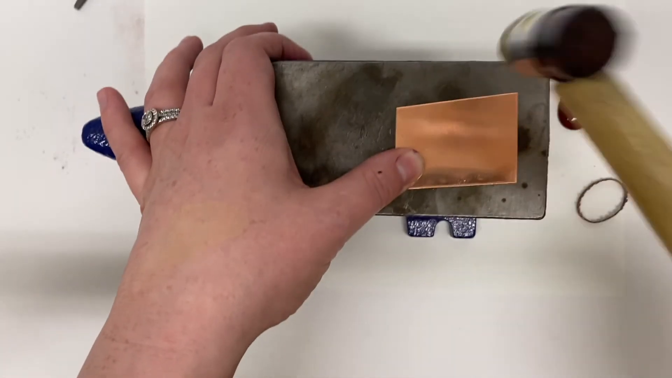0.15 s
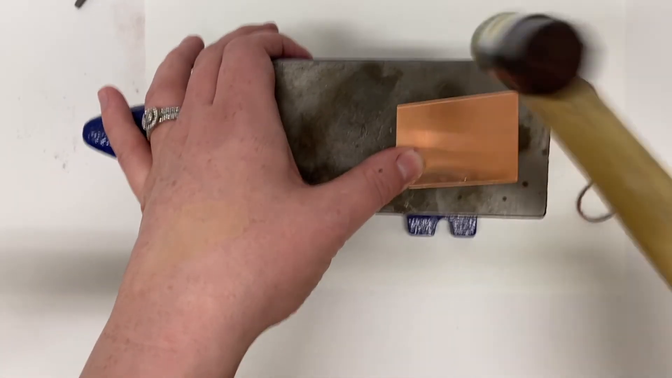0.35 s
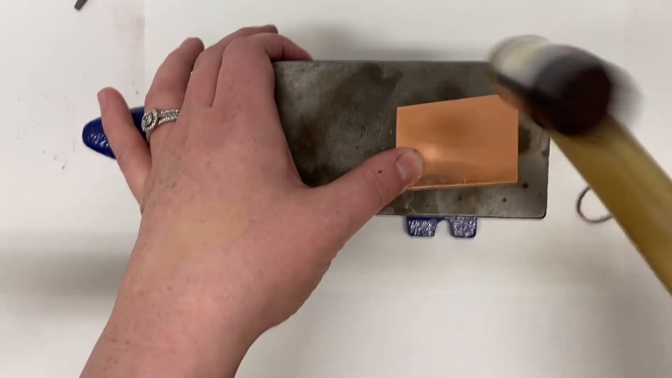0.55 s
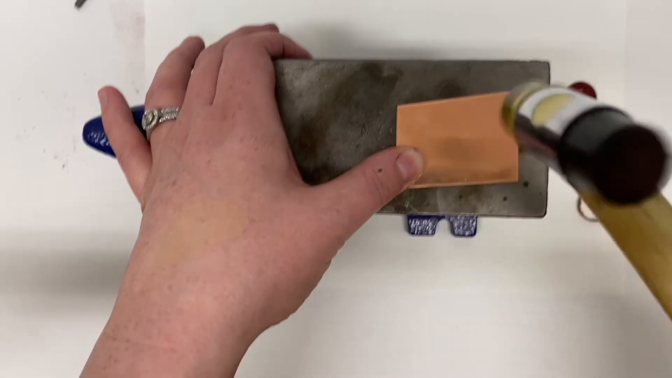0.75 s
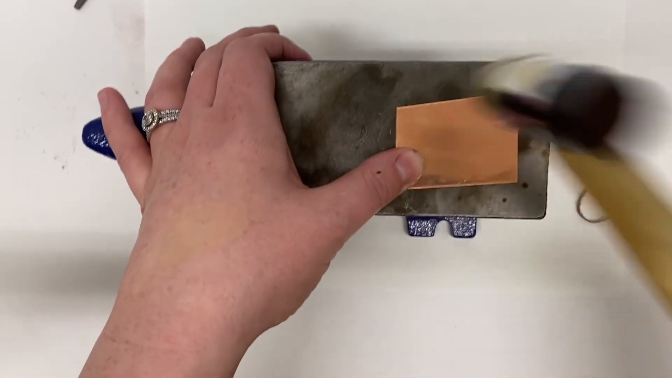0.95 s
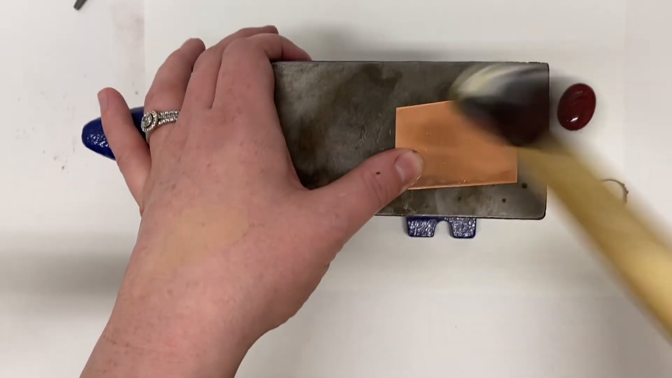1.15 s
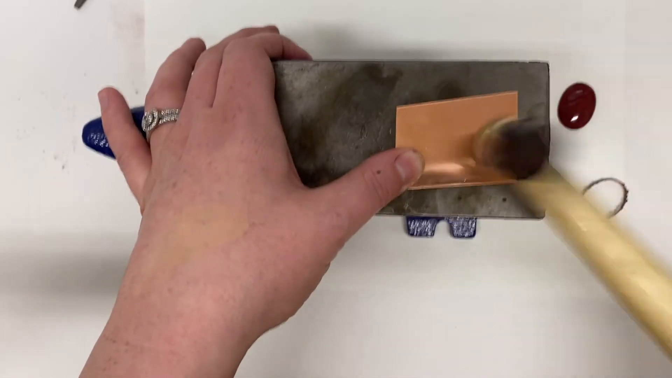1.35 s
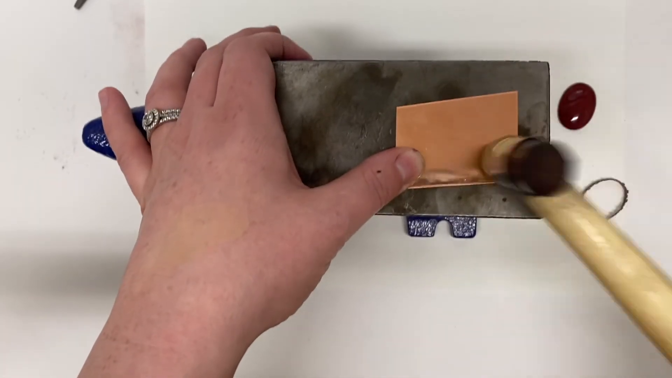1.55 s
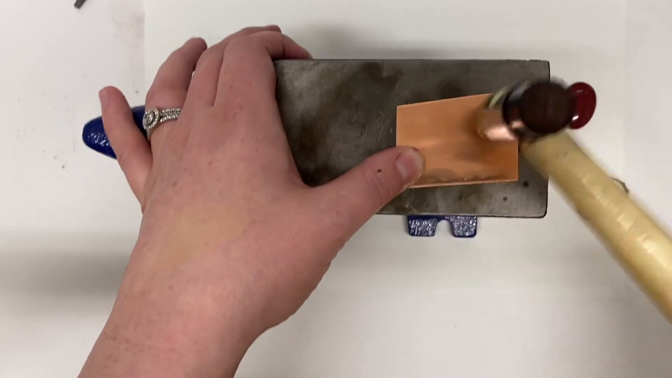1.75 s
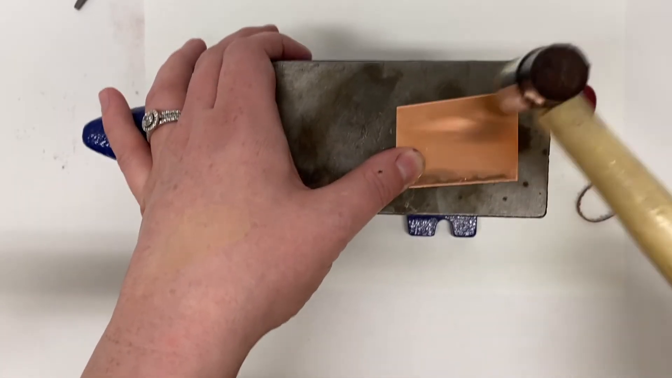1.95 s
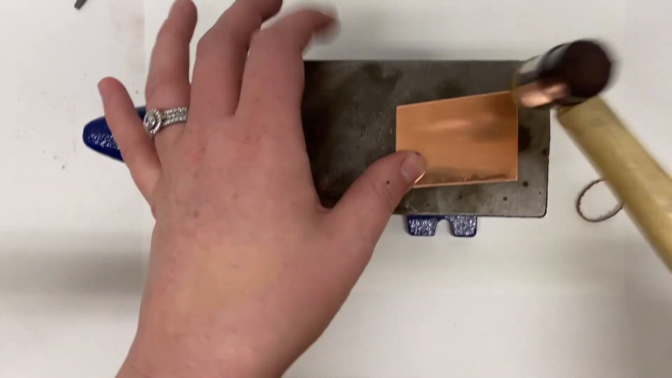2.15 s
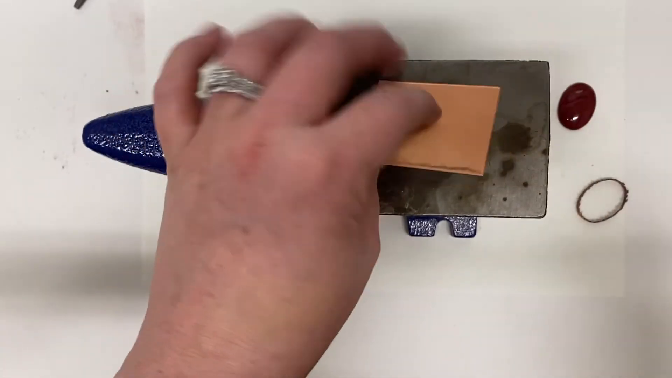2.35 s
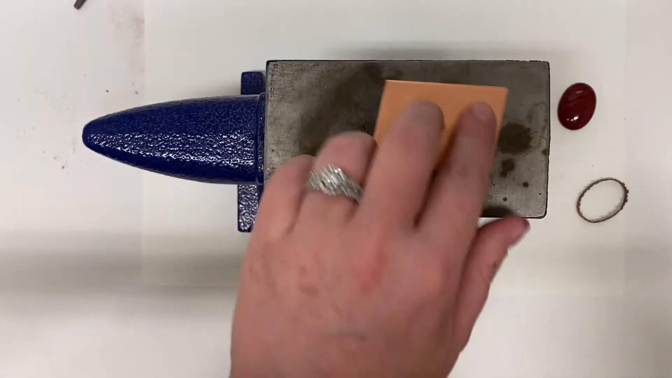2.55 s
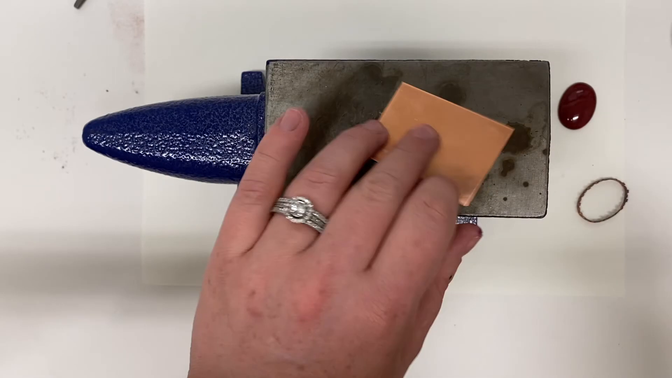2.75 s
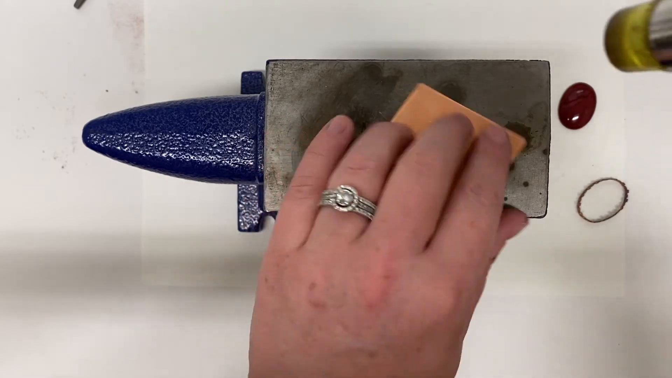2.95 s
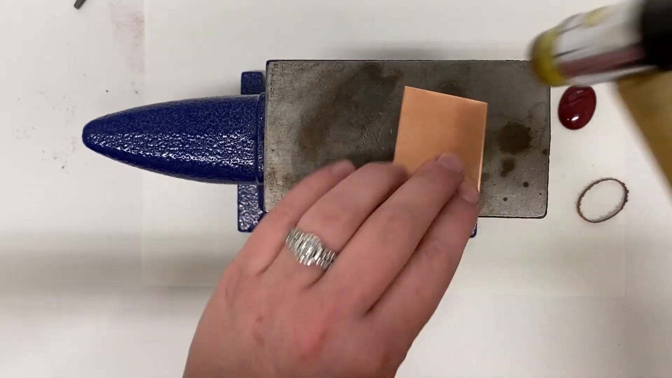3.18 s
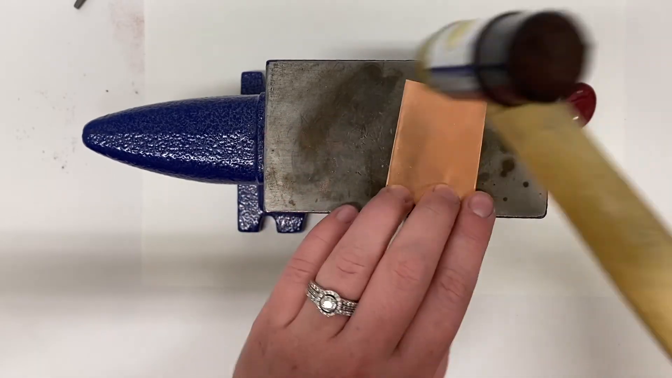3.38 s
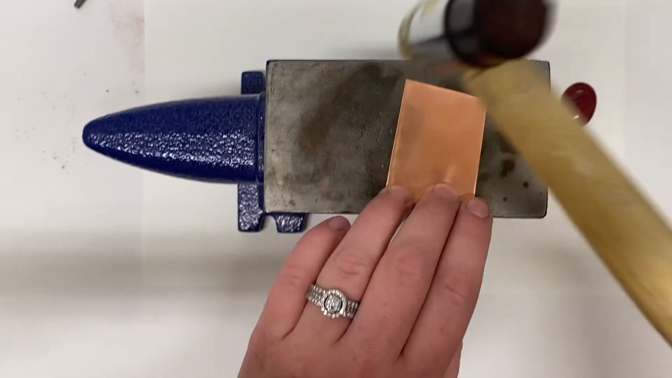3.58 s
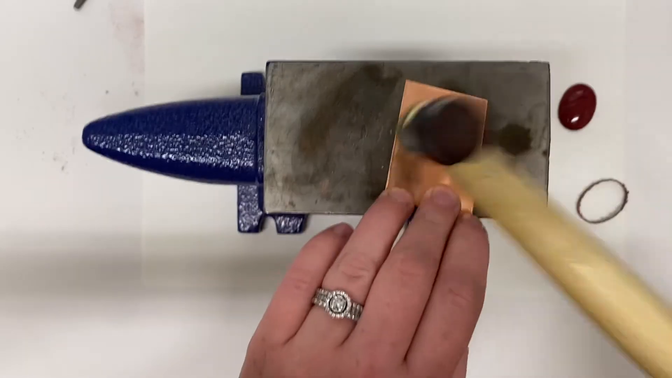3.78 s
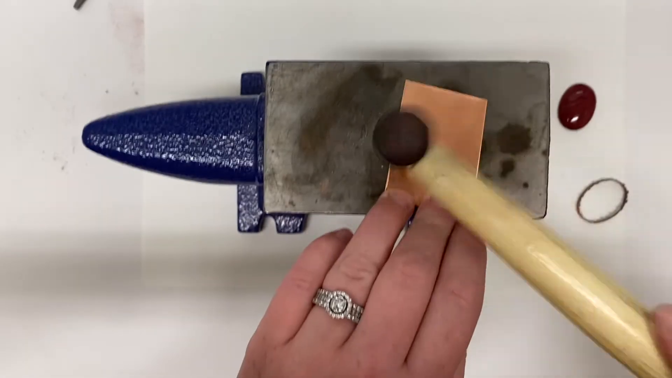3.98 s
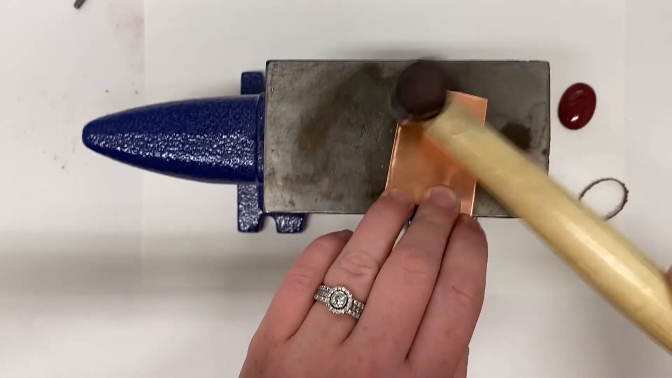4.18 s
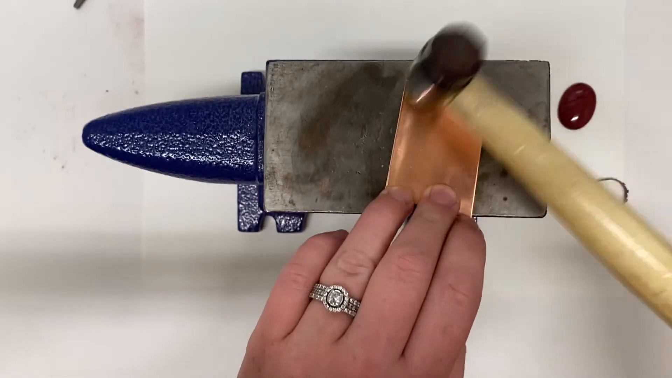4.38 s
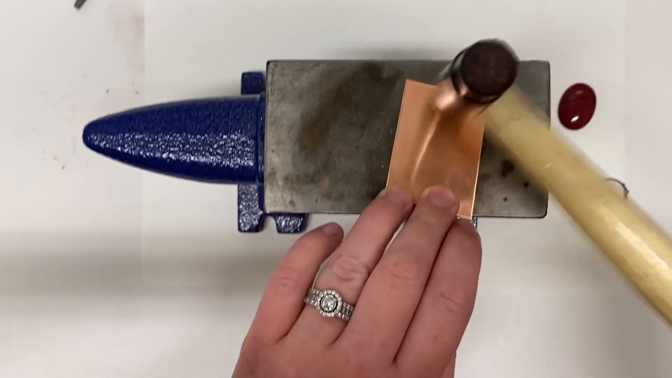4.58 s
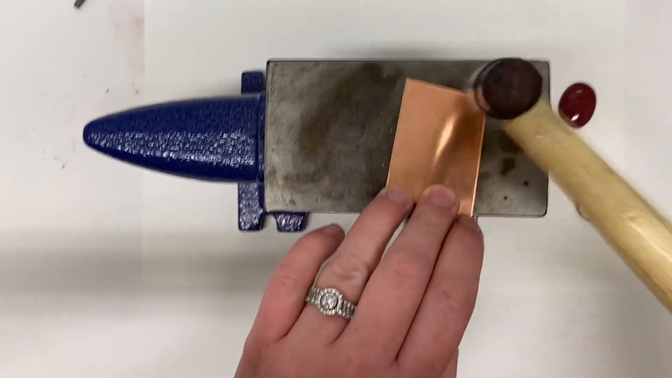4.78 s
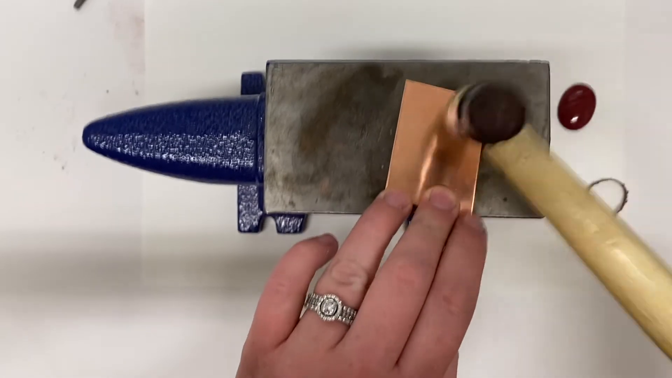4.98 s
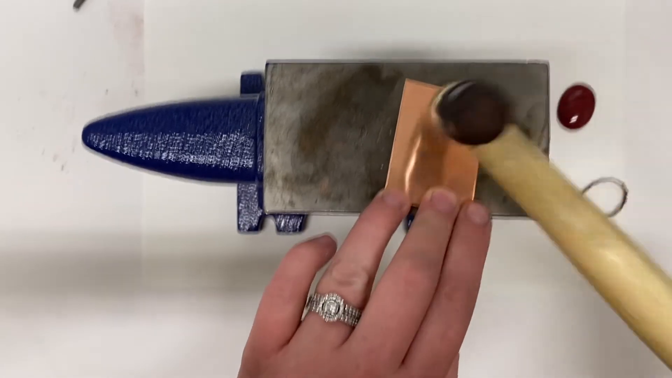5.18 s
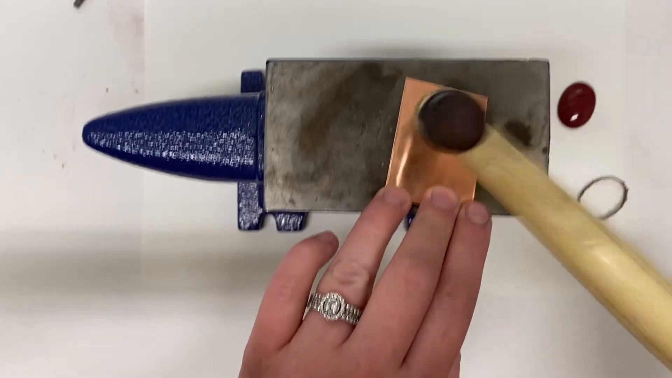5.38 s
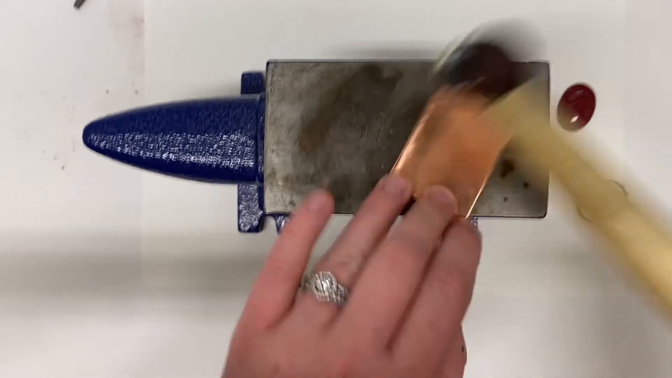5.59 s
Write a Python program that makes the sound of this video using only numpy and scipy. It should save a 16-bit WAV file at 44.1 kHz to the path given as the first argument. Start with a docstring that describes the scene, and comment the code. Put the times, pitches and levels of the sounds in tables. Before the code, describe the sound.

A mallet raps a thin copper sheet on a small steel anvil in two quick, even series, with faint sheet-turning scrapes and ticks between.

```python
"""A mallet beats a small copper sheet on a steel anvil in two quick series, close under a stereo microphone.
Each blow is a light first touch, a slap of choked tones and noise bursts, a thud of damped bench modes
and clatter of decaying noise from a small room.
Between the series fingers turn the sheet: it slides as grainy noise, ticks as short puffs and makes the
anvil sing thinly. Quiet steady noise is the rumble of the room."""
import sys
import numpy as np
from scipy import signal
from scipy.fft import rfft, irfft
from scipy.io import wavfile
from scipy.ndimage import uniform_filter1d, minimum_filter1d

SR = 44100
rng = np.random.default_rng(int(sys.argv[2]) if len(sys.argv) > 2 else 0)


def persist_wave(psi):
    """Save psi, clipped to +-1, as 16-bit WAV."""
    counts = np.round(np.clip(psi, -1, 1) * 32767).astype(np.int16)
    wavfile.write(sys.argv[1], SR, np.atleast_2d(counts).T)


N = 248279

# Mallet blows, the first still dying away at the start: t/s, force/dB, lower sheet resonance f/Hz,
# its level/dB, upper sheet resonance f/Hz, fizz level/dB relative to the body of the slap
BLOWS = [(-.145, 4, 3295, -6, 5360, -3), (0.0422, 1, 3770, -1.5, 5294, -3.5),
         (.2312, -1, 3400, -4, 5050, -5.5), (0.4168, -1, 3397, -2.5, 5240, -4.5),
         (0.61, -1, 3353, -3.5, 5360, -1), (0.792, -1, 3438, -8.5, 5317, 0.5),
         (0.9746, -1, 3420, -8, 5620, -1), (1.1615, -1, 3443, -5.5, 5350, -2),
         (1.3437, .5, 3960, -5.5, 5520, -2), (1.5289, 1.5, 3820, -5.5, 5420, -1.5),
         (1.7149, -1, 3852, -7.5, 5470, 1.5), (1.9005, 0, 3410, -1.5, 5250, -2),
         (2.082, 0, 3720, -3.5, 5350, -5.5), (3.446, -2, 3130, -3, 5530, -2.5),
         (3.6189, -.5, 3540, -2.5, 5680, -5.5), (3.795, -0.5, 3400, -9, 5180, -2),
         (3.9782, 1, 2775, 0, 5150, -3.5), (4.1726, .5, 3420, -3.5, 5145, -5.5),
         (4.3574, .5, 3310, -3, 5054, -3), (4.547, .5, 3384, -3.5, 5240, -4),
         (4.7394, 1.5, 2543, -9, 5330, -2.5), (4.9292, -1.5, 3390, -7.5, 5360, 0),
         (5.1244, -0.5, 3370, -4.5, 5110, -3), (5.317, -.5, 3365, -5.5, 5280, -5),
         (5.5121, -2, 2656, -3.5, 5450, -3)]
# The room around the bench, relative levels: f/Hz, near reflections level/dB, their t60/s,
# late tail level/dB, its t60/s, left-right likeness (0 to 1)
ROOM = [(40, -7.5, .2, -5.5, 0.93, 0.94), (152, -2.5, 0.067, -8.5, 0.073, 1),
        (273, -12.5, 0.28, -13, 1, 0.74), (620, -6.5, 0.034, -11, 0.57, 0.32),
        (1400, -7, 0.049, -11, 0.29, 0.52), (4000, -14.5, .07, -16, 0.55, .7),
        (12000, -14, .07, -19, .25, 0.66)]


def slaps():
    """Sheet slapped on steel: first touch, then a few ms of ringing that the pressure chokes."""
    # Sheet and mallet face while in contact: f/Hz, level/dB
    clack_modes = [(1000, -29), (1500, -25.5), (1950, -11.5), (2400, -19), (2780, -6), (3810, -22),
                   (4250, -21), (4650, -15.5), (4900, -7.5), (5750, -8), (6200, -11.5), (6800, -9.5)]
    # Treble noise of first contact: f/Hz, width/Hz, level/dB within the band set
    fizz_bands = [(8330, 600, 12.5), (7200, 1600, -7.5), (10030, 1100, -10), (11930, 1500, -4)]
    # Highest, shortest noise, same columns
    air_bands = [(14000, 690, -3), (15700, 800, -0.5), (13000, 800, 5)]
    slap_db, slap_share = -13.5, .05  # level at force 0 dB; share of the force in dB that the slap follows
    grit_db, mean_air_db, air_vary_db = -5.5, -13.5, 2.5  # relative to the body of the slap
    touch_lead_s, mean_touch_db, touch_vary_db = .0083, -42.5, 2.5  # mallet first brushes the raised sheet

    out, t = np.zeros(N), np.arange(1500) / SR
    for s, force_db, low_hz, low_db, high_hz, fizz_db in BLOWS:
        modes = clack_modes + [(low_hz, low_db), (high_hz, 0)]
        hz, mode_db = np.transpose(modes)[:, :, None]
        # each blow lands elsewhere: phase, pitch and level of every mode differ
        turn = rng.random(hz.shape)
        tune, vary = rng.standard_normal((2, *hz.shape))
        phase = 2 * np.pi * (hz * (1 + 0.0041 * tune) * t + turn)
        tones = gain_of(mode_db + 1.6 * vary) * np.sin(phase)
        body = peaked(contact(t, 0.00076, 0.0021, 0.0013) * tones.sum(0))

        grit_burst = burst(t, 0.00032, 0.0017, 0.0027)
        grit = peaked(resonate(grit_burst, [(3120, 1500, 0.0015), (5770, 2700, 0.011)]))
        fizz = peaked(resonate(burst(t, 0.00017, 0.002, 0.0011), fizz_bands))
        air = peaked(resonate(burst(t, 0.000067, 0.00047, 0.00016), air_bands))
        air_db = mean_air_db + air_vary_db * rng.standard_normal()
        touch_db = mean_touch_db + touch_vary_db * rng.standard_normal()

        whole = body + gain_of(grit_db) * grit + gain_of(fizz_db) * fizz + gain_of(air_db) * air
        add(out, s, gain_of(slap_db + slap_share * force_db) * whole)
        add(out, s - touch_lead_s, gain_of(touch_db) * tap(3000, 0.0067, -34.0, -26.5))
    return out


def bench():
    """The thud of one blow: a jolt, its modes and echoes, the bass arriving last through the bench top."""
    # Bench and anvil mount: f/Hz, level/dB (relative), t60/s, left minus right level/dB
    bench_modes = [(46, -19, 0.44, 0), (60, -21, .6, -2), (81.5, -18, 0.43, -2), (101.7, -22, 1, 1.5),
                   (109.6, -32, 1, 1.5), (151.9, -14.5, 0.62, -3.5), (193, -24.5, 0.13, -2.5),
                   (197.7, -13, 0.4, -0.5), (261.1, -6, 0.63, -2.5), (318, -14.5, 0.097, 3.5),
                   (332.3, -12, 0.25, -3.5), (376, -20.5, 0.075, -5.5), (425.3, -1.5, 0.1, -3),
                   (433.3, -1.5, 0.091, -12.5), (489, -21.5, .3, -2), (509, -12.5, 0.37, -0.5),
                   (563, -1.5, 0.1, -1.5), (637.5, -24, 0.097, -18), (643.7, -15.5, 0.15, -6),
                   (835, -21.5, 0.7, -4), (971, -20, 0.11, -5), (922, -21.5, 0.27, 1), (1064, -29, .1, 1),
                   (1290, -25.5, .1, -3)]
    # First jolt of the bench top, same columns
    punch_modes = [(277, -3, 0.099, 1), (444, 17, 0.0067, 0.5), (634, 6.5, 0.03, -7), (884, -2, 0.075, -1)]
    spread = .14  # bending waves arrive after spread / sqrt(Hz) seconds, plus a fixed delay

    hz, t = np.fft.rfftfreq(SR, 1 / SR), np.arange(SR) / SR
    small_top = (1j * hz / (1j * hz + 130)) ** 2  # a small top radiates no deep bass
    jolt = irfft(rfft(wood(punch_modes)) * small_top, SR)
    echoes = signal.fftconvolve(jolt, tail(ROOM), axes=1)[:, :SR]
    thud = jolt + wood(bench_modes) + gain_of(5.5) * echoes

    push = (t / .0001) ** 2 * np.exp(-t / .0001)  # soft face: a smooth force, mostly within 1 ms
    travel = np.exp(-4j * np.pi * spread * np.sqrt(hz) - 2j * np.pi * hz * 0.004888)
    low_cut = 1 / (1 + (42 / (hz + 1)) ** 4)
    return gain_of(-3.0) * irfft(rfft(thud) * rfft(push / push.sum()) * travel * low_cut, SR)


def aftersound():
    """Thud and scattered clatter of every blow; the thud repeats alike, the noise of the clatter is new."""
    # Clatter of the slap scattered by the room, relative levels: f/Hz, near reflections level/dB,
    # their t60/s, late tail level/dB, its t60/s, left-right likeness (0 to 1)
    scatter = [(695, -26, 0.044, -20.5, 0.58, 0.17), (1260, -19.5, .08, -26, 0.4, 0.27),
               (2420, -20.5, 0.14, -27, 0.64, .6), (3270, -9.5, .07, -12.5, 0.38, 1),
               (4400, -22, 0.076, -24, 0.38, 0.28), (5330, -16.5, 0.41, -27, 0.64, 1),
               (7210, -21, 0.092, -20, 0.13, 0.98), (8600, -18.5, 0.13, -33, 0.55, 1),
               (12190, -30.5, 0.081, -24, 0.078, 0.39), (15200, -33, .06, -33, .2, .9),
               (16300, -59.5, .06, -61.5, .2, .9)]
    thud_db, clatter_db = -25.5, 17  # gains at force 0 dB
    clatter_share = .15  # the thud follows the force in full, the clatter far less

    thuds, clatter, thud = np.zeros((2, N)), np.zeros((2, N)), bench()
    for s, force_db, low_hz, low_db, high_hz, fizz_db in BLOWS:
        add(thuds, s - .0089, gain_of(thud_db + force_db) * thud)
        echoes = tail(scatter)
        # the echoes keep the colour of their blow
        echoes += resonate(echoes, [(high_hz, 300, -5.0), (low_hz, 300, low_db)])
        add(clatter, s + 0.0029, gain_of(clatter_db + clatter_share * force_db) * echoes)
    return thuds + ring(clatter, 1.0)


def wood(modes):
    """One second of damped sines for two channels, each mode leaning to one side."""
    t, out = np.arange(SR) / SR, np.zeros((2, SR))
    for hz, db, t60, lean_db in modes:
        sides = gain_of([[lean_db / 2], [-lean_db / 2]])
        out += sides * gain_of(db - 60 * t / t60) * np.sin(2 * np.pi * hz * t)
    return out


def ring(x, db):
    """Anvil and sheet sing on briefly after any contact, as resonances driven by it."""
    # Anvil and sheet: f/Hz, level/dB (relative), approximate t60/s
    ring_modes = [(2780, -7, .12), (3390, -6, .08), (3810, -8, .08), (4895, -3, .25), (5250, -7, .07),
                  (5850, -9, .1)]
    modes = [(hz, 2.4 / t60, mode_db) for hz, mode_db, t60 in ring_modes]
    return x + gain_of(db) * resonate(x, modes)


def tap(hz, t60, fizz_db, knock_db):
    """A light contact: a short puff around one pitch, with some treble and a dull knock."""
    fall_s = np.clip(t60, .005, .1) / np.log(1000)
    puff = burst(np.arange(3000) / SR, 0.00053, 0.00092, fall_s)
    middle = resonate(puff, [(hz, 1300, 0), (5000, 1800, -4)])
    middle = resonate(middle, [(3800, 4500, 0.0026)])
    ends = resonate(puff, [(850, 1600, knock_db), (9500, 1900, fizz_db)])
    ends = resonate(ends, [(850, 2700, 0.016), (9500, 4300, 0.0053)])
    return peaked(middle + ends)


def ticks():
    """The loose sheet tapping the anvil; a brighter tick has more fizz and less knock."""
    # Taps: t/s, level/dB before the ring, centre f/Hz, brightness/dB, t60/s (held to 0.005-0.1 in tap)
    tick_list = [(.3407, -52, 3460, -11, 0.024), (1.292, -44, 5110, -5, 0.083),
                 (2.4163, -58.5, 4720, -4, 0.071), (2.581, -68, 2330, 7, 0.023),
                 (2.6929, -69, 5000, -2, 0.039), (2.7953, -69, 2760, 0, 0.058), (2.8954, -68, 2600, 2, .03),
                 (2.9224, -66, 2540, 0, .025), (2.9964, -56.5, 4670, 5, 0.067), (3.0246, -59, 5900, 7, .03),
                 (3.0954, -59, 4530, 2.5, 0.047), (3.2415, -79, 4930, -3, .012),
                 (3.302, -63.5, 4180, 4, .03), (3.3617, -62, 2650, -20, 0.014),
                 (3.7323, -48.5, 5100, -6, 0.037), (4.0164, -29, 4800, 1, 0.014),
                 (4.6745, -48, 5900, -4, 0.059)]
    base_fizz_db, base_knock_db, knock_slope = -17.5, -16.5, 1.3  # slope in dB per dB of brightness
    out = np.zeros(N)
    for s, db, hz, bright_db, t60 in tick_list:
        fizz_db = base_fizz_db + bright_db
        knock_db = base_knock_db - knock_slope * bright_db
        add(out, s, gain_of(db) * tap(hz, t60, fizz_db, knock_db))
    return out


def drag():
    """Level of the sliding sheet: a smooth rise and fall for each push of the fingers."""
    # Fingers drag the sheet over the steel: start t/s, rise t/s, fall t/s, peak level/dB before the ring
    drag_list = [(2.25, .05, 0.076, -67), (2.41, 0.01, 0.072, -69.5), (2.47, .11, .05, -74),
                 (2.688, 0.013, 0.11, -70.5), (2.79, 0.011, 0.046, -67), (2.85, 0.16, 0.2, -66.5)]
    out = np.zeros(N)
    for s, rise, fall, db in drag_list:
        t = np.arange(0, rise + fall, 1 / SR)
        angle = np.interp(t, [0, rise, rise + fall], [0, np.pi / 2, np.pi])
        add(out, s, gain_of(db) * np.sin(angle) ** 1.4)  # sine arch to a power
    return out


def slide():
    """Grainy friction of the sheet on the anvil face, whose edge catches and slips at random."""
    # Colour of the friction: f/Hz, relative level/dB per Hz
    slide_tone = [(700, -34), (1300, -18.5), (2200, -10.5), (2700, -2.5), (3100, -7), (3900, -9),
                  (4800, -3), (6000, -3), (7200, -6), (10000, -8.5), (12500, -9), (15500, -17),
                  (16500, -43)]
    catches_per_s, catch_db, catch_vary_db = 260, -5.5, 4.5  # catch level relative to the grit

    hz = np.fft.rfftfreq(N, 1 / SR)
    flutter_db = 3.0 * evened(uniform_filter1d(rng.standard_normal(N), 130))
    grit = rng.standard_normal(N) * gain_of(flutter_db)
    catch_gain = gain_of(catch_vary_db * np.minimum(rng.exponential(1, N), 4))
    catches = (rng.random(N) < catches_per_s / SR) * catch_gain
    decay = np.exp(-1 / (.0012 * SR))  # each catch dies with a 1.2 ms time constant
    catches = signal.lfilter([1], [1, -decay], catches) * rng.standard_normal(N)
    friction = evened(grit) + gain_of(catch_db) * evened(catches)
    return evened(irfft(rfft(friction) * gain_of(read(slide_tone, hz)), N)) * drag()


def squeal():
    """A thin tone of the anvil that builds up under the sliding sheet and rings on after it."""
    squeal_db = 5.5  # relative to the drag
    window = round(.13 * SR)  # only a drag that lasts 0.13 s makes the anvil sing
    noise, mode = rng.standard_normal(N), [(4895, 7, 0)]
    lasting = uniform_filter1d(minimum_filter1d(drag(), window), window)
    return gain_of(squeal_db) * resonate(noise * lasting, mode) / resonate(noise, mode).std()


def tail(table):
    """Near reflections and a longer tail as decaying noise, each band with its own energy and decay."""
    hz, t = np.fft.rfftfreq(256, 1 / SR)[:, None], np.arange(420) * 64 / SR
    power = 0
    for level, decay in ((1, 2), (3, 4)):  # table columns: near, then late
        t60 = read(table, hz, axis=decay)
        power = power + gain_of(read(table, hz, axis=level) - 60 * t / t60) ** 2 / t60
    magnitude = np.sqrt(power * 6 * np.log(10) / SR)
    out = noise_pair(magnitude, read(table, hz[:, 0], axis=5), size=256) / 9.
    return out * np.clip(np.arange(out.shape[1]) / (0.0047 * SR), 0, 1)  # echoes build up


def hush():
    """Quiet steady rumble of the room, as coloured noise partly shared by the two sides."""
    # Colour of the rumble: f/Hz, relative level/dB per Hz
    hush_tone = [(15, -35.5), (25, -1), (120, 4), (300, -8), (430, -10.5), (505, -3.5), (590, -17),
                 (1190, -27), (3720, -28), (4870, -20), (6210, -28.5), (7920, -30), (8590, -38),
                 (16000, -34.5)]
    # Likeness of the two sides: f/Hz, left-right likeness (0 to 1)
    hush_same = [(60, 1), (180, 0.93), (550, 0.15), (1650, 0.57), (4970, 0.43), (15000, 0.23)]
    hush_db = -71.5  # rms
    hz = np.fft.rfftfreq(2048, 1 / SR)
    magnitude = gain_of(read(hush_tone, hz))[:, None] * np.ones(N // 512 + 5)
    noise = noise_pair(magnitude, read(hush_same, hz), size=2048)[:, :N]
    return gain_of(hush_db) * evened(noise)


def contact(t, rise, hold, fall):
    """Envelope that rises, lasts for the contact time and dies; all times in seconds."""
    return (1 - np.exp(-(t / rise) ** 2)) * np.exp(-np.maximum(t - hold, 0) / fall)


def burst(t, rise, hold, fall):
    """Noise under the contact envelope."""
    return contact(t, rise, hold, fall) * rng.standard_normal(len(t))


def resonate(x, modes):
    """Sum of two-pole resonances (f/Hz, width/Hz, level/dB), neighbours in opposite sign."""
    out = np.zeros(x.shape)
    for k, (hz, width, db) in enumerate(modes):
        pole = np.exp((2j * np.pi * hz - np.pi * abs(width)) / SR)
        ringing = 2 * signal.lfilter([1 - abs(pole)], [1, -pole], x).imag
        out += (-1) ** k * gain_of(db) * ringing
    return out


def noise_pair(magnitude, same, size):
    """Two channels of noise from a bins x frames magnitude and a likeness per bin."""
    a, b, c, d = rng.standard_normal((magnitude.shape[1], magnitude.shape[0], 4)).T
    same = np.clip(same, -1, 1)[:, None]
    left = a + 1j * b
    right = same * left + np.sqrt(1 - same ** 2) * (c + 1j * d)
    return signal.istft(magnitude * np.array([left, right]), nperseg=size, noverlap=size * 3 // 4)[1]


def gain_of(db):
    """Decibels to a factor."""
    return 10 ** (np.asarray(db) / 20)


def evened(x):
    """Scales to rms 1."""
    return x / np.sqrt(np.mean(x ** 2) + 1e-20)


def peaked(x):
    """Scales so that the loudest 4 ms have rms 1."""
    return x / np.sqrt(uniform_filter1d(x ** 2, SR // 250).max())


def read(points, hz, axis=1):
    """One column of a table over frequency, straight on a log axis."""
    table = np.transpose(points)
    return np.interp(np.log(hz + 1), np.log(table[0] + 1), table[axis])


def add(mix, s, sound):
    """Mixes a sound in at s seconds, cut to what falls inside the mix."""
    at = round(s * SR)
    sound = sound[..., max(-at, 0):]
    part = mix[..., max(at, 0):][..., :sound.shape[-1]]
    part += sound[..., :part.shape[-1]]


def scene():
    """Blows, handling sounds with their reverberation, and the room."""
    # Side lean of the direct metal sounds: f/Hz, left minus right level/dB
    metal_lean = [(1200, 2.5), (2400, -6), (3400, -8), (4400, -0.1), (9000, 1)]
    handling = ring(ticks(), 9.) + ring(slide(), 10.) + squeal()
    lean_db = read(metal_lean, np.fft.rfftfreq(N, 1 / SR)) / 2
    metal = irfft(rfft(ring(slaps(), 0.98) + handling) * gain_of([lean_db, -lean_db]), N)
    reverberation = signal.fftconvolve(handling[None], tail(ROOM), axes=1)[:, :N]
    return metal + reverberation + aftersound() + hush()


def record(dry):
    """Two ports a few centimetres apart shift the treble between the sides; peaks round off; then the band limit."""
    # Microphone ports: f/Hz, phase/rad by which the left port leads
    port_lead = [(0, 0), (1640, -.1), (2410, .2), (2670, .9), (5080, .2), (6720, 2.7), (8010, 3.7),
                 (9820, 6.0), (11200, 6.7), (12700, 9.0), (14500, 10.0), (15800, 12.3), (16700, 13.1)]
    edge_hz = 16950
    turn = np.exp(.5j * read(port_lead, np.fft.rfftfreq(N, 1 / SR)))
    ported = irfft(rfft(dry) * np.array([turn, 1 / turn]), N)
    rounded = ported / (1 + (abs(ported) / .95) ** 4) ** .25
    band_limit = signal.firwin(255, edge_hz, window=("kaiser", 9), fs=SR)
    return signal.oaconvolve(rounded, band_limit[None], "same")


dry = scene()
out = record(dry)
persist_wave(out)
```